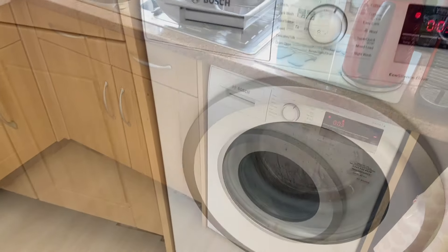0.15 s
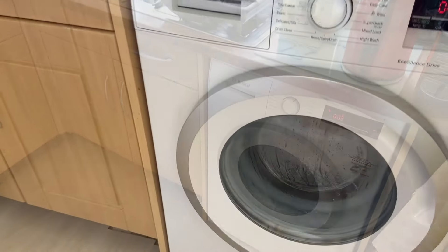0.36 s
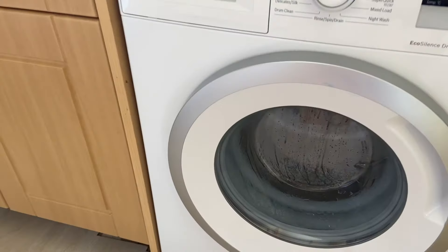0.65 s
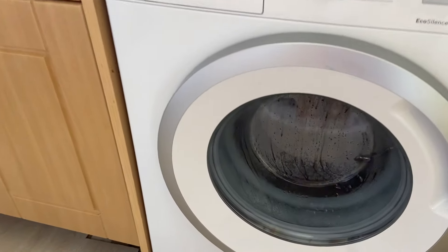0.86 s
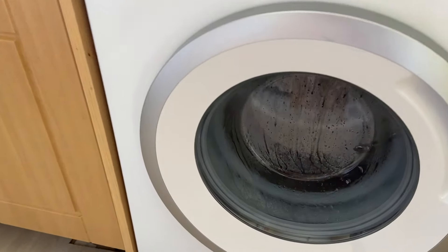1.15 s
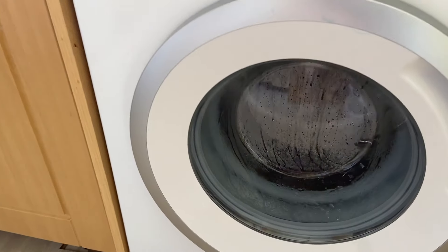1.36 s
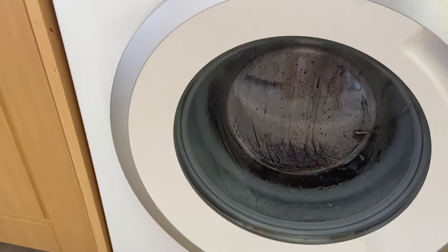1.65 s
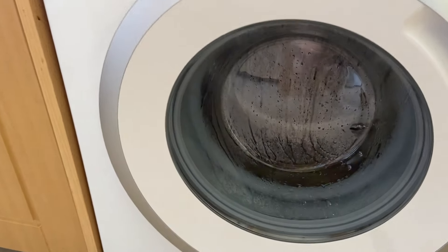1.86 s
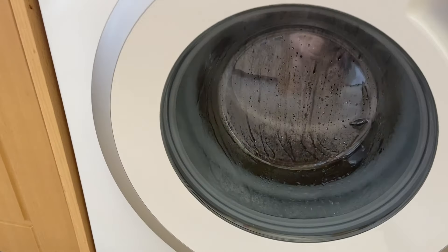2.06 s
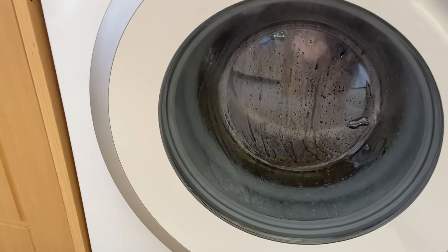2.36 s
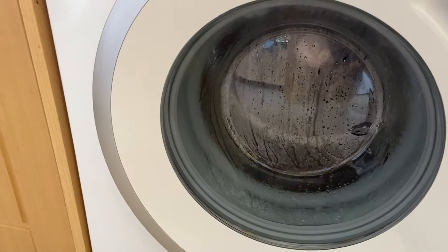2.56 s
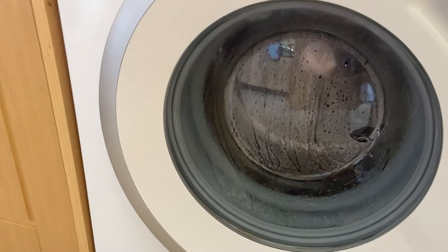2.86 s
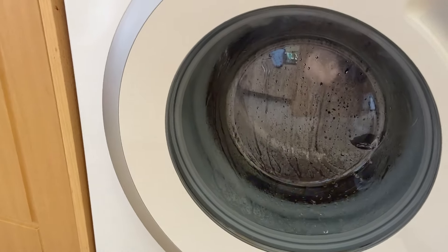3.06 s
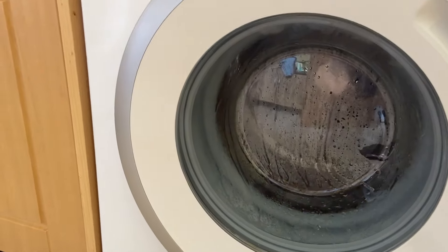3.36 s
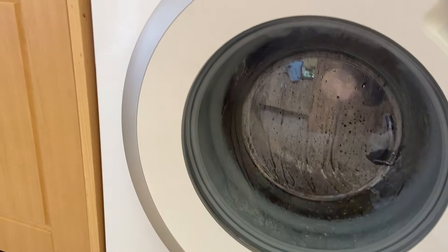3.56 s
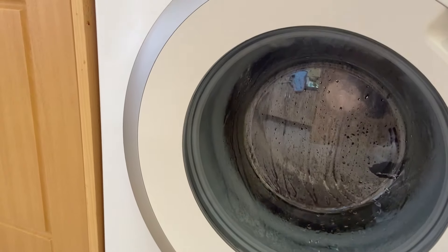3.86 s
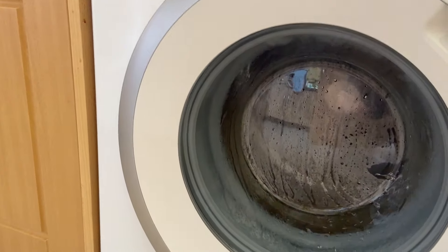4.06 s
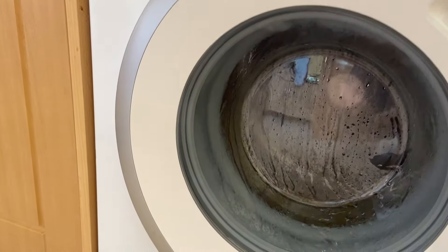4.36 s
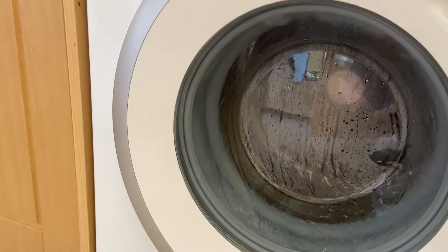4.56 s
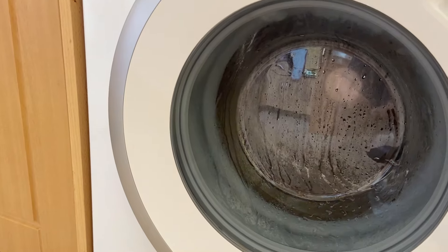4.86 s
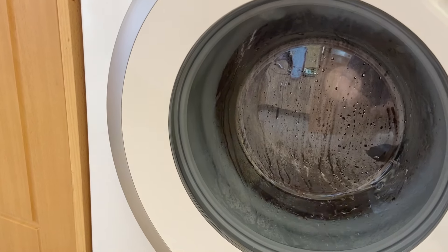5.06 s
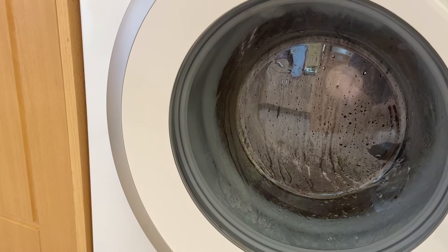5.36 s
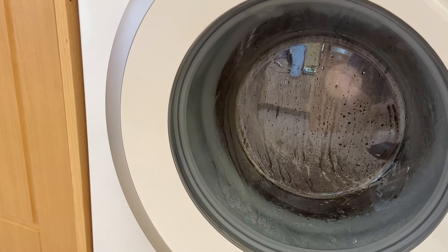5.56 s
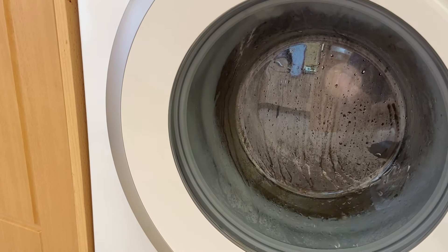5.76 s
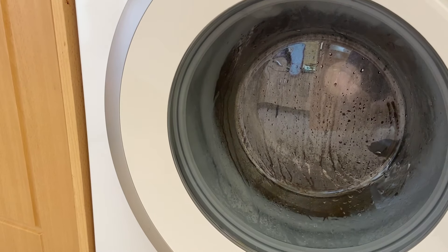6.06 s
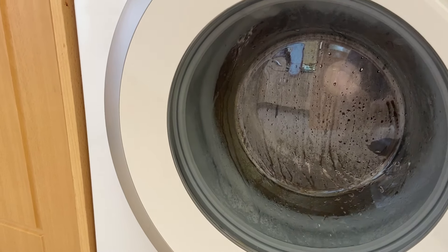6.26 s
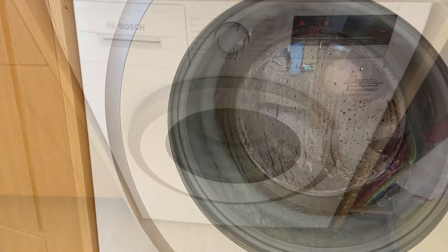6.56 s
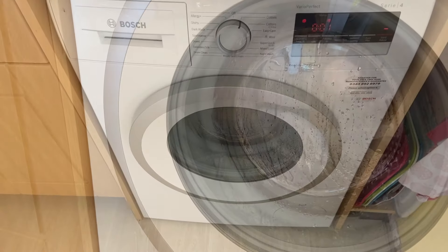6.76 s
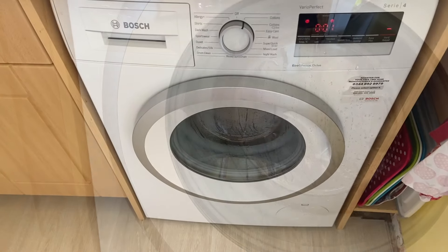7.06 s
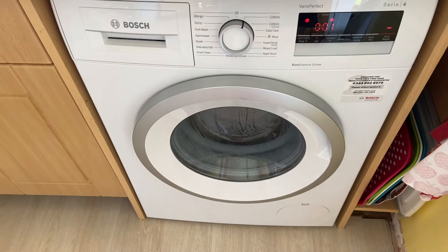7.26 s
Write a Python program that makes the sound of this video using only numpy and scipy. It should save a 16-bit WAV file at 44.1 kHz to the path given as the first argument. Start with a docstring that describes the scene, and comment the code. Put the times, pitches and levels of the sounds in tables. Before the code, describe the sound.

Throbbing low drum hum with rushing air and thin motor whine swells close to a washing machine door, ending in a slower, softly knocking spin.

```python
"""A front-loading washing machine spins at top speed in a kitchen, its unbalanced drum humming through the cabinet.
The stereo microphone starts a metre back from its closest place and moves in to the door.
The hum is a set of sines locked to the drum; motor, bearing and drain pump add thin sines of their own.
Coloured noise makes the air in the tub, the spray, the panel, the belt's whirr and a rattle of fittings.
Near the end it cross-fades into a slower, more distant spin with a sinking whine and soft knocks."""
import sys
import numpy as np
from scipy import signal
from scipy.fft import rfft, irfft, next_fast_len
from scipy.io import wavfile
from scipy.ndimage import uniform_filter1d, map_coordinates

SR = 44100
rng = np.random.default_rng(int(sys.argv[2]) if len(sys.argv) > 2 else 0)


def generate_wav(signal):
    """Clip the signal to [-1, 1] and save it as 16-bit WAV at the path in sys.argv[1]."""
    frames = np.transpose(np.atleast_2d(signal))
    scaled = np.clip(frames, -1, 1) * 32767
    pcm = np.round(scaled).astype(np.int16)
    wavfile.write(sys.argv[1], SR, pcm)


N = 325863

DRUM_HZ = 23.53
BELT_RATIO = 10.68  # turns of the motor shaft for each turn of the drum
# Layers of the fast spin, each: level in dB at the closest place, dB lost per metre back.
BOOM, HUM = (-27, 4.6), (-28, 4.05)
RUMBLE, AIR, SPRAY = (-35, 3.9), (-37.5, 2.7), (-53.4, 1.3)
BALL_PASS, SLOT_WHINE = (-46, 2.1), (-60, 0)


def fast_spin():
    """The drum's speed is held almost constant; hum and motor follow it, and most layers grow as the microphone nears."""
    turns = DRUM_HZ * (clock() - .0192) + 0.0017 * wobble(2.094)
    spray_db = heard_db(SPRAY)
    nearness = amp(spray_db - np.median(spray_db))  # a gain, 1 at the middle distance
    tones = drum(turns) + motor(turns, nearness)
    tones = tones + nearness * (pump() + bearing())
    return tones + air(turns) + whirr() + rattle()


# What the drum shakes out of the cabinet, right at the door; drum() raises it by 1 dB.
# Each row: multiple of the drum speed, level in dB against the hum.
DRUM_AT_DOOR = [(1, -26), (2, -18.5), (3, -11.5), (4, 0), (5, -10), (6, -6.5), (7, -34), (8, -19.5),
                (9, -8.5), (10, -19), (11, -31), (12, -7), (13, -19.5), (14, -32), (15, -14), (16, -20),
                (17, -48), (18, -16), (19, -26), (20, -21), (21, -24.5), (22, -39), (23, -32), (24, -23),
                (25, -31), (26, -32.5), (27, -24), (28, -36), (29, -30), (30, -21)]
# The same shaking heard a step away; drum() raises it by 0.2 dB.
# Each row: multiple of the drum speed, level in dB against the hum.
DRUM_STEP_AWAY = [(1, -36.5), (2, -19.5), (3, -11), (4, -19), (5, -9), (6, -5.5), (7, -12.5), (8, -13.5),
                  (9, -4.5), (10, -17), (11, -23), (12, -11.5), (13, -12), (14, -17.5), (15, -20.5),
                  (16, -29.5), (17, -22), (18, -11.5), (19, -20), (20, -16.5), (21, -14.5), (22, -17.5),
                  (23, -19.5), (24, -19), (25, -24), (26, -25), (27, -29), (28, -15), (29, -23),
                  (30, -24.5)]
BOOMING_ORDER = 4
APPROACH_START_S, APPROACH_END_S = 0.91, 2.46  # the microphone leans in to the door
LAG_TURNS, SCATTER_RAD = 0.1311, 2.03  # delay and phase smear of the highest order


def drum(turns):
    """The unbalanced load thumps the cabinet once a turn; the colour changes with the microphone's place."""
    near = np.clip((clock() - APPROACH_START_S) / (APPROACH_END_S - APPROACH_START_S), 0, 1)
    boom_db, hum_db = heard_db(BOOM), heard_db(HUM)
    phases = ring_phases(np.array(DRUM_STEP_AWAY)[:, 1])
    out = np.zeros((2, N))
    for (order, near_db), (_, far_db), phase in zip(DRUM_AT_DOOR, DRUM_STEP_AWAY, phases):
        level_db = hum_db + near * (near_db + 1) + (1 - near) * (far_db + 0.2)
        if order == BOOMING_ORDER:  # a room mode gives this order a level of its own
            level_db = boom_db
        # high orders arrive later, more smeared by echoes, and less steady
        high = order / len(DRUM_AT_DOOR)
        smear = SCATTER_RAD * high * rng.standard_normal()
        # at the door, glass and panels sound out of step and the thump blurs into a hum
        smear = smear + .55 * near * rng.standard_normal()
        cycles = order * (turns - LAG_TURNS * high) + (phase + smear) / (2 * np.pi)
        out -= amp(level_db) * tone(order * DRUM_HZ, cycles, waver_db=-0.36 + 2.3 * high, drift=0.41 * high)
    return out


def ring_phases(levels_db):
    """The phase of each harmonic when a body with these levels rings after a push (minimum phase)."""
    cepstrum = irfft(np.log(amp(np.r_[levels_db[0], levels_db, levels_db[-1]])))
    cepstrum[len(cepstrum) // 2:] = 0
    return 2 * rfft(cepstrum).imag[1:-1]


# The shaft's own hum and a faint upper whine.
# Each row: multiple of the shaft speed, level in dB at the middle distance.
SHAFT_TONES = [(1, -53), (24, -71.5), (28, -77), (32, -74), (40, -67.5)]
# strong tones, in multiples of the shaft speed: ball pass, its octave, slot whine, its octave
WHINE_ORDERS = (3.0745, 6.149, 8, 16)
INVERTER_HZ, INVERTER_DB = 10971, -67.5  # switching whistle, level at the middle distance


def motor(turns, nearness):
    """The belt-driven motor sings at multiples of its shaft speed, with its bearing and its inverter."""
    shaft_hz = BELT_RATIO * DRUM_HZ
    # the load tugs at the belt once a turn, and the belt flutters
    shaft = BELT_RATIO * turns + .003 * np.sin(2 * np.pi * turns) + .0015 * wobble(45)
    whine = sum(amp(db) * tone(order * shaft_hz, order * shaft, waver_db=0.5, drift=.4)
                for order, db in zip(WHINE_ORDERS, whine_levels()))
    upper = sum(amp(db) * tone(order * shaft_hz, order * shaft, waver_db=2.5, drift=.6)
                for order, db in SHAFT_TONES)
    whistle_cycles = INVERTER_HZ * clock() + .1 * wobble(45)
    whistle = amp(INVERTER_DB) * tone(INVERTER_HZ, whistle_cycles, waver_db=2.5, drift=.9)
    return whine + nearness * (upper + whistle)


# The ball pass's octave comes and goes with the microphone's place. Each row: time in seconds, level in dB.
BALL_OCTAVE = [(0, -62), (1.2, -51.5), (2.3, -58), (2.9, -56), (3.35, -47.5), (3.7, -45), (4.4, -49.5),
               (6.45, -50)]
# The slot whine's octave stands out only close to the door. Each row: time in seconds, level in dB.
SLOT_OCTAVE = [(0, -73), (1.6, -63.5), (2.8, -69), (3.6, -62.5), (4.8, -58.5), (6.45, -58.3)]
# The slot whine swells briefly. Each row: peak time in seconds, rise in dB.
SLOT_SWELLS = [(1.5, 8), (1.8, 9), (2.5, 6.5), (4.5, 4), (5.6, 7), (5.9, 9.5), (6.4, 6.5)]


def whine_levels():
    """The levels in dB of the motor's four strong tones."""
    ball_octave_db, = curves(BALL_OCTAVE)
    slot_octave_db, = curves(SLOT_OCTAVE)
    slot_db = heard_db(SLOT_WHINE) + swells(SLOT_SWELLS, half_s=0.17)
    return heard_db(BALL_PASS), ball_octave_db, slot_db, slot_octave_db


# The drum bearing's strongest partials. Each row: frequency in Hz, level in dB at the middle distance.
BEARING = [(988, -58), (1247, -59), (1490, -64), (1600, -62), (1647, -63), (1820, -61.5), (1953, -64),
           (2213, -61), (2536, -64), (2821, -65), (3063, -68), (3270, -69), (3521, -68.5)]


def bearing():
    """The drum bearing sings in thin partials that flutter and break up, each on its own."""
    return sum(amp(db) * tone(hz, hz * clock() + .12 * wobble(22), waver_db=4, drift=1.6)
               for hz, db in BEARING)


MAINS_HZ = 50
# The pump's buzz. Each row: multiple of the mains, level in dB at the middle distance.
PUMP = [(2, -46), (4, -42.5), (6, -50)]


def pump():
    """The drain pump buzzes at even multiples of the mains."""
    return sum(amp(db) * tone(order * MAINS_HZ, order * MAINS_HZ * clock(), waver_db=4.0, drift=0.063)
               for order, db in PUMP)


# Noise colours of the tub's rumble, the air past the drum, the spray, a cabinet panel's resonances
# and a resonance of the door. Each row: frequency in Hz, relative level in dB per Hz.
TUB = [(20, -35), (40, -24), (55, -5), (70, -8), (83, 2), (105, -6.5), (125, -6), (160, -10.5), (185, -17),
       (215, -5), (262, -22), (310, -9), (400, -14), (470, -14.5), (600, -35)]
RUSH = [(420, -30), (530, -5), (650, 0.5), (740, 3), (830, -6.5), (1000, -8), (1100, -9.5), (1240, -9),
        (1340, -13.5), (1450, -11.5), (1580, -10.5), (1900, -10.5), (2060, -12.5), (2200, -13), (2430, -16),
        (2620, -15), (3080, -17.5), (3550, -21.5), (3800, -23), (6000, -30.5)]
HISS = [(2500, -20), (4500, -2.5), (5900, -4.5), (7400, -1.5), (11000, -2.5), (15200, -5)]
PANEL = [(380, -25), (440, -4.5), (485, -2), (560, -3.5), (610, -8), (655, -3.5), (700, -15)]
DOOR = [(820, -25), (930, 1), (1000, -2.5), (1060, -17)]
# How loudly the panel shivers; air() plays it 5.5 dB lower. Each row: time in seconds, level in dB.
SHIVER = [(0.15, -49), (0.5, -35.5), (1.4, -33), (2.6, -38), (3.9, -39.5), (5.3, -51), (6.45, -50)]
# How loudly the door rings at the microphone's place. Each row: time in seconds, level in dB.
DOOR_RING = [(0.2, -60), (0.7, -50), (1.8, -49), (3.0, -59)]
GRIND_SHARE = .2  # share of the rush's power that repeats with every turn
RUSH_LAG_TURNS = 0.64  # the rush swells this long after each thump


def air(turns):
    """Tub rumble, panel, rushing air and hissing spray throb with the drum's turns; the door rings steadily."""
    angle = 2 * np.pi * turns
    throb = unit(np.cos(angle) + 0.57 * np.cos(2 * angle) + 0.96 * np.cos(3 * angle))
    rumble = amp(heard_db(RUMBLE) + 0.6 * throb) * noise(TUB, width_db=10.0, ripple_db=2.5)

    panel_db = curves(SHIVER)[0] - 5.5
    panel = amp(panel_db + 1.7 * throb) * noise(PANEL, width_db=-8.0, ripple_db=2.5)
    door = amp(curves(DOOR_RING)[0]) * noise(DOOR, width_db=1, ripple_db=0)

    rushing = eddies(noise(RUSH, width_db=0, ripple_db=1.1))
    rushing = np.sqrt(1 - GRIND_SHARE) * rushing + np.sqrt(GRIND_SHARE) * grind(turns, RUSH)
    swish = np.cos(2 * np.pi * (turns - RUSH_LAG_TURNS))
    rush = amp(heard_db(AIR) + 0.6 * swish + 0.29 * wobble(11)) * rushing

    spray = eddies(noise(HISS, width_db=0, ripple_db=1.2))
    flutter_db = .22 * throb + .25 * wobble(14)
    hiss = amp(heard_db(SPRAY) + flutter_db) * spray
    return rumble + panel + door + rush + hiss


def grind(turns, spectrum):
    """The bearing's roughness: the same stretch of noise comes round with every turn of the drum."""
    size = 4096  # points in one turn
    hz = np.arange(size // 2 + 1) * DRUM_HZ
    colour = amp(along(spectrum, hz)) * (hz > spectrum[0][0]) * (hz < spectrum[-1][0])
    mid, side = rfft(rng.standard_normal((2, size))) * colour
    side = side * amp(along(WIDTH, hz))
    one_turn = irfft(np.array([mid + side, mid - side]) * lean(hz))
    pair = np.array([np.interp(turns, np.arange(size) / size, ear, period=1) for ear in one_turn])
    return pair / np.sqrt(np.mean(pair.mean(axis=0) ** 2))


EDDY_DB = 1.0  # rms depth of the turbulent patches


def eddies(x):
    """Turbulence: patches of the noise in time and frequency grow and fade on their own."""
    z = signal.stft(x, nperseg=512)[2]
    field = rng.standard_normal(z.shape[1:])
    field = uniform_filter1d(uniform_filter1d(field, size=6, axis=0), size=18, axis=1)
    patchy = signal.istft(z * amp(EDDY_DB * unit(field)), nperseg=512)[1][:, :N]
    return unit(patchy) * np.std(x)


# The whirr's colour. Each row: frequency in Hz, relative level in dB per Hz.
WHIRR = [(2050, -18), (2140, 2.5), (2215, 3.5), (2300, -15.5)]
# The whirr flares up. Each row: peak time in seconds, rise in dB.
WHIRR_SWELLS = [(0.3, 7), (0.62, 5), (1.12, 6)]
WHIRR_DB = -57  # between swells


def whirr():
    """A narrow, restless band of noise, probably the belt, that flares up a few times."""
    level_db = WHIRR_DB + swells(WHIRR_SWELLS, half_s=0.065)
    restless_db = 2.5 * wobble(10)
    return amp(level_db + restless_db) * noise(WHIRR, width_db=3, ripple_db=1.5)


# The fittings' colour. Each row: frequency in Hz, relative level in dB per Hz.
RATTLE = [(850, -3.5), (1150, 3), (1380, -5), (1700, 1.5), (2050, -1), (2550, -6.5), (3100, -8),
          (3800, -13.5)]
# The rattle surges. Each row: peak time in seconds, rise in dB.
RATTLE_SURGES = [(2.15, 3), (4.53, 6)]
RATTLE_DB, TICKS_PER_S, TICK_DECAY_S = -51, 260, .003


def rattle():
    """Loose fittings chatter faintly: small uneven ticks of noise, each dying away, that come in surges."""
    tick_db = 1.5 * rng.standard_normal(N) + 1.2 * wobble(6)
    ticks = (rng.random(N) < TICKS_PER_S / SR) * amp(tick_db)
    keep = np.exp(-1 / (TICK_DECAY_S * SR))
    envelope = unit(signal.lfilter([1], [1, -keep], ticks))
    level_db = RATTLE_DB + swells(RATTLE_SURGES, half_s=.12)
    return amp(level_db) * envelope * noise(RATTLE, width_db=0, ripple_db=2.0)


# The slower spin loses speed. Each row: time in seconds, drum speed in Hz.
SLOW_SPEED = [(6.9, 18.668), (7.12, 18.582), (7.39, 18.453)]
# What the slower drum shakes out of the cabinet. Each row: multiple of the drum speed, level in dB.
SLOW_HUM = [(4, -48), (5, -42.5), (6, -38.5), (7, -50), (9, -47), (10, -51), (12, -47), (15, -47),
            (16, -54), (26, -51), (35, -51), (37, -53)]
# The slower motor's tones. Each row: multiple of the shaft speed, level in dB.
SLOW_MOTOR = [(3.0745, -50.5), (4, -56), (9.2235, -59)]
# The slower motor's high whine swells and weakens. Each row: time in seconds, level in dB.
SLOW_WHINE = [(6.9, -78), (7.12, -61), (7.25, -60.5), (7.39, -63.5)]
# Colour of the slower spin's air. Each row: frequency in Hz, relative level in dB per Hz.
SLOW_RUSH = [(25, -22), (60, 0), (100, -1), (140, -4), (200, -3), (255, -11), (305, -5), (395, -13),
             (480, -2), (560, -11), (655, -1.5), (730, -5), (880, -14), (1100, -13.5), (1650, -18),
             (2250, -19), (3500, -27), (5500, -33.5), (10000, -36), (15500, -37)]
SLOW_WHINE_ORDER = 24  # multiple of the shaft speed
SLOW_RUSH_DB, SLOW_WHIRR_DB = -38.5, -57


def slow_spin():
    """The drum losing speed, from further back: its hum, blurred by echoes, sinks with the motor's whine."""
    speed_hz, = curves(SLOW_SPEED)
    whine_db, = curves(SLOW_WHINE)
    turns = np.cumsum(speed_hz) / SR
    drum_hz = SLOW_SPEED[1][1]  # sets each tone's stereo place only
    shaft, shaft_hz = BELT_RATIO * turns, BELT_RATIO * drum_hz
    hum = sum(amp(db) * tone(order * drum_hz, order * turns + rng.random(), waver_db=2, drift=.5)
              for order, db in SLOW_HUM)
    whine = sum(amp(db) * tone(order * shaft_hz, order * shaft + .09 * wobble(50), waver_db=1.5, drift=.5)
                for order, db in [*SLOW_MOTOR, (SLOW_WHINE_ORDER, whine_db)])
    rocking_db = .7 * wobble(22)
    rush = amp(SLOW_RUSH_DB + rocking_db) * noise(SLOW_RUSH, width_db=1.5, ripple_db=2.4)
    belt = amp(SLOW_WHIRR_DB) * noise(WHIRR, width_db=-2, ripple_db=4)
    return hum + whine + rush + belt


# The slowing tub knocks softly; the cross-fade lowers it. Each row: start in seconds, level in dB.
KNOCKS = [(7.056, -22.5), (7.191, -31), (7.322, -29.5), (7.335, -29)]
# How the struck tub rings. Each row: frequency in Hz, level in dB, time to fall 60 dB in seconds.
KNOCK_MODES = [(660, -8, 0.044), (710, -2, 0.04), (780, -7, 0.029)]
KNOCK_RISE_S = .002


def knocks():
    """Soft, dull knocks of the tub against its mounts: a few short-lived ringing modes."""
    out = np.zeros(N)
    for start_s, db in KNOCKS:
        t = np.maximum(clock() - start_s, 0)
        ring = sum(amp(level - 60 * np.minimum(t / t60, 5)) * np.sin(2 * np.pi * hz * t)
                   for hz, level, t60 in KNOCK_MODES)
        out += amp(db) * ring * (1 - np.exp(-t / KNOCK_RISE_S))
    return out


# The microphone walks up to the door and leans in.
# Each row: time in seconds, distance in metres back from the closest place.
DISTANCE = [(0.3, 1.0), (1.2, 0.58), (2.3, 0.17), (5.3, 0.013)]


def heard_db(layer):
    """A layer's level over time, falling with the microphone's distance."""
    door_db, loss_db_per_m = layer
    metres, = curves(DISTANCE)
    return door_db - loss_db_per_m * metres


# Stereo width before a layer's own offset. Each row: frequency in Hz, side minus mid in dB.
WIDTH = [(60, -35), (110, -9.5), (200, -15.5), (380, -9.5), (700, -2.5), (1290, -4), (2380, -4), (4400, -8),
         (8120, -5), (15000, 1.5)]


def tone(hz, turns, waver_db, drift):
    """A stereo sine of rms 1 that wavers in level and phase; room echoes shift it between the ears."""
    apart = np.arctan(amp(along(WIDTH, hz))) * rng.choice([-1, 1]) * np.array([[1], [-1]])
    phase = 2 * np.pi * turns + drift * wobble(2.98) + apart
    waver = unit(amp(waver_db * wobble(7)))
    return np.sqrt(2) * lean(hz) * waver * np.cos(phase) / np.cos(apart)


RIPPLE_HZ = 22  # spacing of the small resonances of cabinet and kitchen


def noise(spectrum, width_db, ripple_db):
    """Stereo noise with a mid of rms 1, rippled by many small resonances: narrower in the bass than the treble."""
    low, high = spectrum[0][0], spectrum[-1][0]
    knots = rng.standard_normal(int(SR / RIPPLE_HZ))

    def colour(hz):
        ripple = ripple_db * np.interp(hz / RIPPLE_HZ, np.arange(len(knots)), knots)
        skirts = np.minimum(hz / low, 1) ** 2 / np.maximum(hz / high, 1) ** 2
        return amp(along(spectrum, hz) + ripple) * skirts

    mid, side = filtered(rng.standard_normal((2, N)), colour)
    mid = unit(mid)
    side = filtered(unit(side), lambda hz: amp(along(WIDTH, hz) + width_db))
    return filtered(np.array([mid + side, mid - side]), lean)


# Balance of the two ears. Each row: frequency in Hz, left minus right in dB.
LEAN = [(60, -2), (110, -1), (200, -3.5), (380, -2), (700, 1.5), (1290, 0), (2380, 3.5), (4400, 2.5),
        (8120, 0), (15000, 0.0)]


def lean(hz):
    """Left and right gains at a frequency."""
    half = along(LEAN, np.atleast_1d(hz)) / 2
    return amp(np.array([half, -half]))


def swells(rows, half_s):
    """A rise in dB over time, from (peak s, rise dB) rows of smooth swells, each about two half_s long."""
    return sum(rise_db * np.exp(-((clock() - s) / half_s) ** 2) for s, rise_db in rows)


def wobble(rate):
    """A smooth random curve, rate knots a second."""
    knots = rng.standard_normal(int(N * rate / SR) + 4)
    return map_coordinates(knots, [clock() * rate], mode="mirror")


def curves(rows):
    """One value per sample for each column after the time."""
    s, *cols = np.transpose(rows)
    return [np.interp(clock(), s, c) for c in cols]


def along(points, hz):
    """Read (Hz, value) points on a log axis."""
    f, v = np.transpose(points)
    return np.interp(np.log(hz + 1), np.log(f + 1), v)


def filtered(x, response):
    """x with its spectrum multiplied by a response of frequency."""
    m = next_fast_len(N + SR // 2)
    return irfft(rfft(x, m) * response(np.fft.rfftfreq(m, 1 / SR)), m)[..., :N]


def amp(db):
    """Decibels to gain."""
    return 10 ** (np.asarray(db) / 20)


def unit(x):
    """Scale to rms 1."""
    return x / np.sqrt(np.mean(x ** 2) + 1e-20)


def clock():
    """The time of every sample in seconds."""
    return np.arange(N) / SR


FADE_IN_S, FADE_IN_DB = 0.46, -4.5  # length and starting level of the opening fade
CROSS_START_S, CROSS_END_S = 6.41, 7.116


def scene():
    """The fast spin fades in, and later gives way to the slower one."""
    opening = np.interp(clock(), [0, FADE_IN_S], [amp(FADE_IN_DB), 1])
    share = np.clip((clock() - CROSS_START_S) / (CROSS_END_S - CROSS_START_S), 0, 1)
    fast = opening * (1 - share) ** 0.69 * fast_spin()
    slow = share ** 2.2 * (slow_spin() + knocks())
    return fast + slow


TOP_HZ = 15800


def record(dry):
    """The camera's microphone keeps nothing above its band limit."""
    return filtered(dry, lambda hz: hz < TOP_HZ)


dry = scene()
out = record(dry)
generate_wav(out)
```